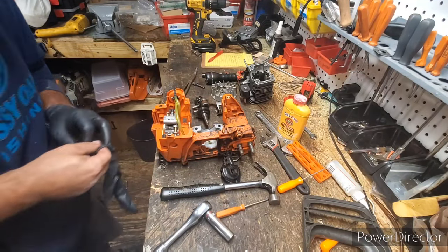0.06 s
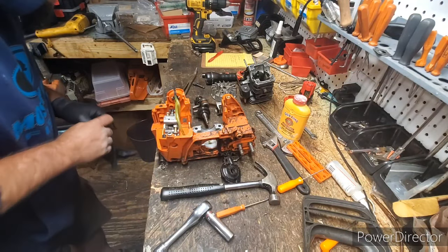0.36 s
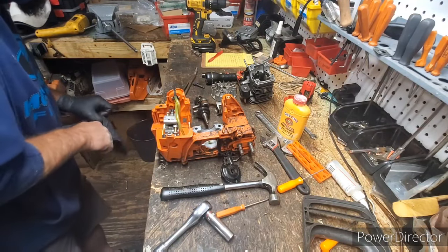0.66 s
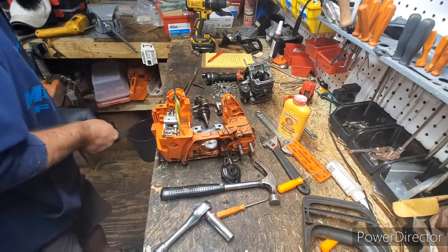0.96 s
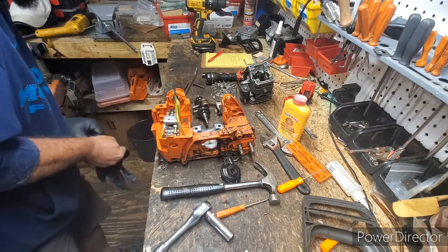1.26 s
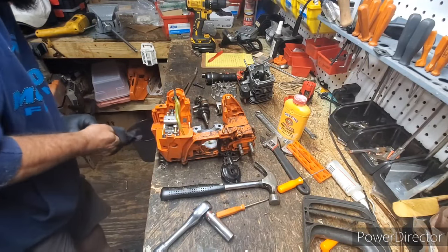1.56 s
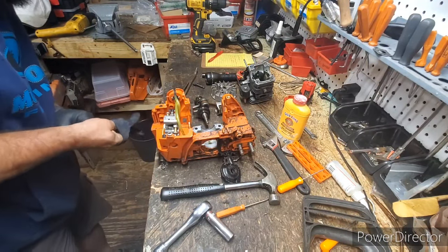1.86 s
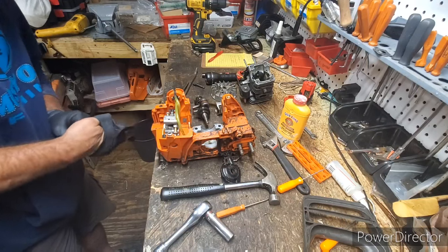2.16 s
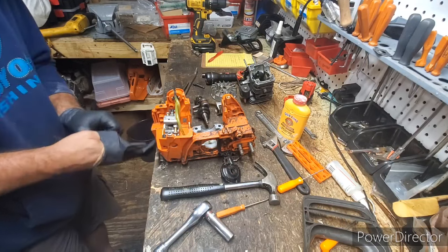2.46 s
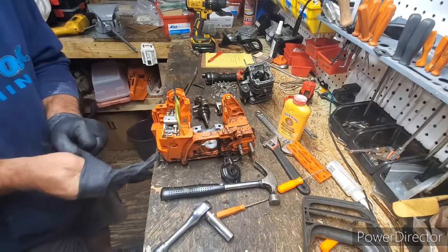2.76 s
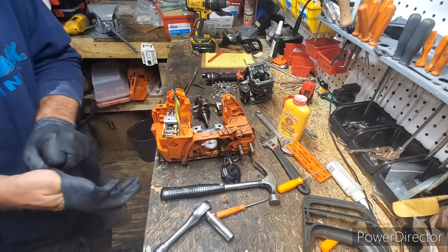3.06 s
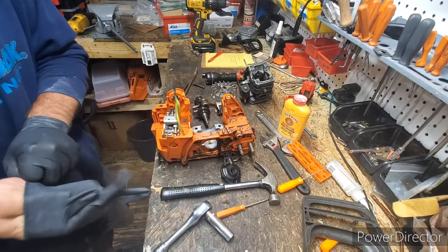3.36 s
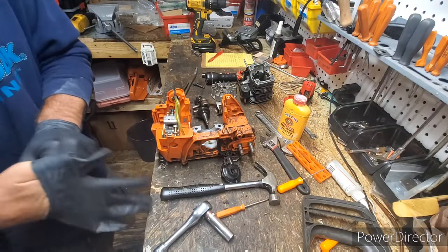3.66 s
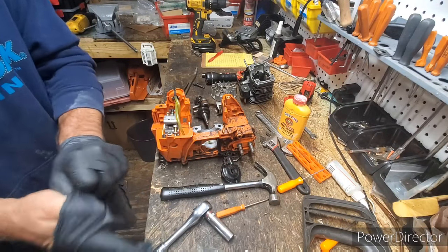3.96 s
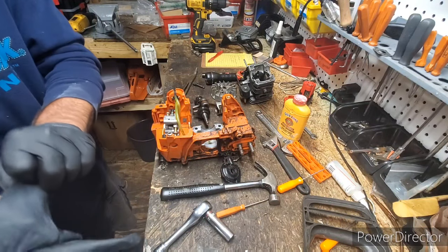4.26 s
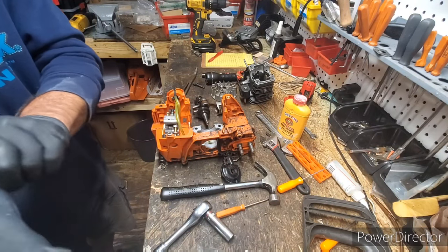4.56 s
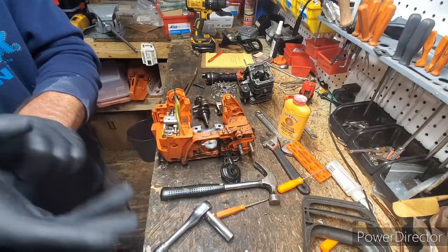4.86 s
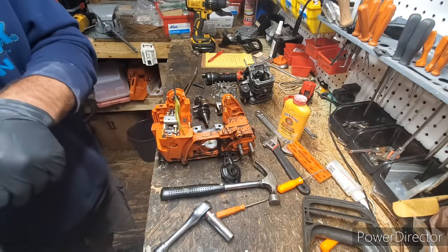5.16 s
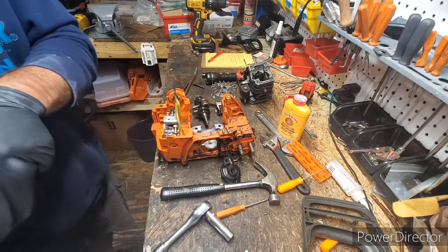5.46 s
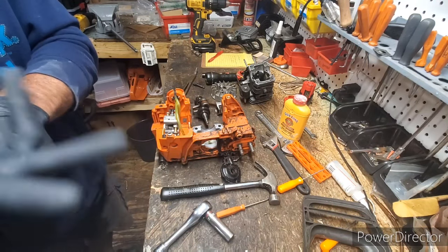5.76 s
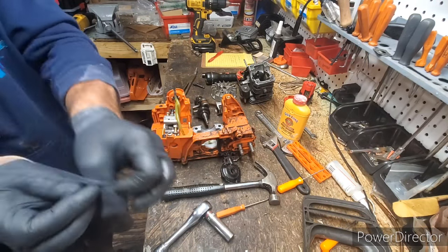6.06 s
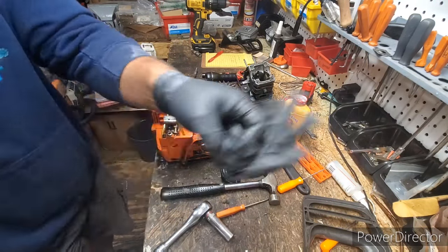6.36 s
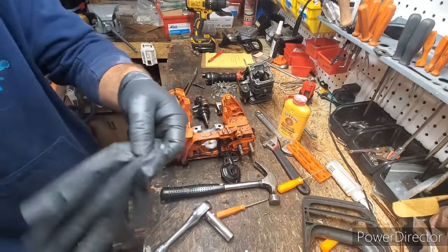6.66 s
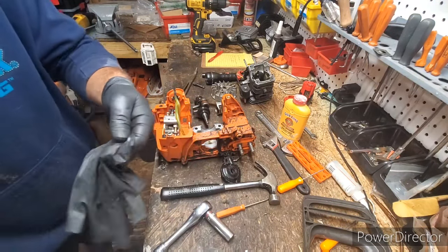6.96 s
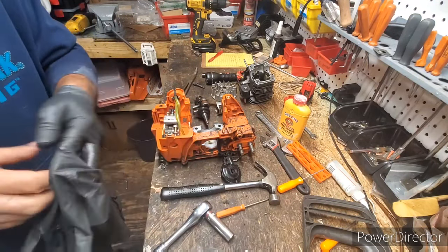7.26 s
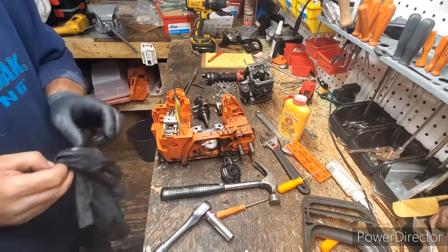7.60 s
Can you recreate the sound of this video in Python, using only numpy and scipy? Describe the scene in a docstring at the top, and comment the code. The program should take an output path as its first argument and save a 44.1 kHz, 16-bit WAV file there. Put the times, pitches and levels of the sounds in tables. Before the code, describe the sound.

A thin rubber glove is worked onto a hand and pulled off, with close rubbing, pops and sharp snaps in a quiet workshop.

```python
"""Rubber glove in a small workshop

Close to the microphone, on the left, a thin rubber glove is worked onto a hand and pulled off again.
The rubber rubs in tiny slips, peels off skin, snaps and flutters; trapped air pops; the loose glove flops.
The biggest flurry, near 6.3 s, is the stretched glove letting go of the fingers. The room hums faintly."""
import sys
import numpy as np
from scipy import signal
from scipy.fft import rfft, irfft
from scipy.io import wavfile

SR = 44100
rng = np.random.default_rng(int(sys.argv[2]) if len(sys.argv) > 2 else 0)


def transcribe(signal):
    """Save signal, clipped to [-1, 1], as a 16-bit WAV file at the path in sys.argv[1]."""
    frames = np.atleast_2d(signal).T
    limited = np.clip(frames, -1, 1)
    pcm = np.round(limited * 32767).astype(np.int16)
    wavfile.write(sys.argv[1], SR, pcm)


N = 345331
TIME = np.arange(N) / SR

# The shop's air, low hum and thin whine. Each row of the air: frequency in Hz, relative level in dB.
AIR_SPECTRUM = [(20, -20), (45, 6.5), (70, 4), (110, 0), (160, -6), (260, -14), (480, -18), (850, -29.5),
                (1400, -16.5), (2600, -27), (6500, -27.5), (7700, -30.5), (15500, -30)]
# Each row of the hum and the whine: time in seconds, level in dB.
HUM_LEVELS = [(0, -65), (1.0, -64), (1.25, -70), (1.85, -69.5), (2.15, -62.5), (3.3, -61.5), (3.8, -66.5),
              (5.6, -65.5), (6.8, -70.5), (7.83, -70.5)]
WHINE_LEVELS = [(1.5, -100), (2.0, -74.5), (2.75, -77), (3.25, -67.5), (4.0, -72.5), (5.9, -82.5),
                (6.8, -84.5), (7.25, -79), (7.8, -68)]
# The shop's decay. Each row: low and high edge in Hz, seconds to fall 60 dB, level in dB.
ROOM_BANDS = [(100, 1000, 0.21, -9.5), (1290, 4560, 0.12, -8.5), (7000, 22000, 0.12, -17.5)]
# Tone of the microphone's far, right-hand port. Each row: frequency in Hz, relative gain in dB.
FAR_PORT_SPECTRUM = [(300, 1), (1300, 0), (4000, -2.5), (6500, -1.5), (8500, 7), (14000, 1.5)]
# Where the hands are. Each row: time in seconds, leftward bias in dB.
HAND_POSITION = [(0.0, 9), (0.13, 7.5), (1.31, 9.5), (1.35, 6.5), (5.32, 8.5), (5.95, 11), (6.48, 5),
                 (6.85, 11), (7.11, 8), (7.83, 9.5)]

# Slack rubber, squeaky slips, tight slips and the fluttering sheet.
# Each row: frequency in Hz, relative level in dB.
BODY_SPECTRUM = [(25, -35), (70, -3), (180, -7), (350, -3), (550, 0.5), (800, -6), (1150, -4), (1600, -4),
                 (3000, -37.5)]
SQUEAK_SPECTRUM = [(1500, -31.5), (2800, -12), (3700, -1.5), (5200, -1.5), (6800, -0.5), (7600, -13),
                   (9000, -9), (12000, -33)]
HISS_SPECTRUM = [(4000, -35.5), (7500, -27), (9500, -6.5), (12000, 2), (15000, 6), (16000, -6.5)]
FLUTTER_SPECTRUM = [(25, -35.5), (100, -16), (250, -12), (450, 0.5), (900, -2), (1200, -3), (1800, 3.5),
                    (3200, -2), (5200, -3), (6800, 0.5), (7600, -14), (10000, -7.5), (15000, -4)]
# Resonances of the folds. Each row: centre in Hz, width in Hz, relative level in dB.
FOLD_MODES = [(1670, 650, -3), (2390, 490, -2), (2950, 720, 2), (3180, 1700, 0)]
# The slack glove shoves air; air pockets pop. Each row: start in seconds, level in dB, pitch in Hz.
GLOVE_FLOPS = [(.058, -36.5, 62), (.04, -48, 128), (.29, -43.5, 179), (.302, -38.5, 58), (.395, -50, 163),
               (1.0, -44.5, 60), (1.052, -49, 168), (5.255, -42, 90), (5.27, -41, 170), (6.07, -44.5, 120),
               (6.28, -34, 180), (6.32, -27.5, 173), (6.345, -38, 66), (6.935, -39.5, 179), (6.93, -43, 75),
               (7.145, -56.5, 197)]
AIR_POPS = [(1.058, -39.5, 650), (1.344, -42, 740), (1.385, -24.5, 600), (2.27, -42.5, 570),
            (3.664, -55, 785), (3.79, -38, 306), (4.231, -35, 630), (4.275, -33.5, 558), (4.314, -29, 597),
            (4.452, -29, 494), (4.661, -38.5, 493), (4.673, -35.5, 417), (4.709, -41, 476),
            (5.257, -28, 466), (5.271, -41.5, 280), (5.703, -37, 730), (6.07, -28.5, 524),
            (6.2838, -5.5, 484), (6.2845, -6, 905), (6.29, -16, 410), (6.309, -18.5, 412),
            (6.362, -14, 978), (6.379, -20.5, 482), (6.945, -43, 420)]
# First a faint, narrow, breath-like hiss near 1.8 kHz; the other rows are short rubbery resonances.
# Each row: middle in seconds, level in dB, half length in seconds, pitch in Hz, relative bandwidth.
NARROW_SWELLS = [(.33, -63, 0.12, 1790, .06), (1.715, -55.5, 0.018, 1600, .17),
                 (2.931, -51, 0.027, 1880, .12), (3.898, -48.5, .042, 2690, 0.27),
                 (4.477, -51, 0.028, 2040, 0.15), (5.047, -41.5, 0.039, 2630, .17)]
# Light contact between strokes. Each row: time in seconds, treble in dB, crinkle in dB above the treble.
LIGHT_CONTACT = [(0, -57.5, -19.5), (.25, -58.5, -4.5), (.45, -65, -3.5), (.53, -66.5, -4),
                 (1.29, -64.5, -13), (1.46, -55.5, -4), (1.85, -59, -8), (2.8, -65.5, -5.5),
                 (3.4, -63, 6.5), (3.95, -53.5, -5), (4.39, -68.5, 4.5), (4.52, -51.5, -1),
                 (4.95, -58, -5.5), (5.42, -51.5, -3.5), (5.9, -62, -15), (6.8, -68.5, -1),
                 (7.02, -65.5, -6.5), (7.83, -67, -4)]
# Strokes of rubber over skin or rubber. Each row: peak time in seconds, treble in dB,
# swell and fade in seconds, slack body and crinkle in dB above the treble.
RUB_STROKES = [(.035, -49, 0.012, 0.027, -35, -19), (.165, -50.5, 0.036, .015, -34, -14),
               (.39, -59, 0.029, 0.066, -16, -19), (0.562, -50.5, 0.0065, 0.036, -11, -12),
               (0.842, -62, 0.066, 0.05, -25, -12), (.956, -51, .007, 0.085, -20.5, -13.5),
               (1.055, -43, .008, 0.017, -2.5, -12.5), (1.33, -58, 0.032, .02, -8, -10),
               (1.71, -53.5, 0.033, 0.042, -1.5, -12), (1.955, -45, 0.039, 0.034, -10, -10),
               (2.15, -48.5, 0.061, 0.057, -7.5, -5.5), (2.212, -40, 0.032, 0.067, -11, -6.5),
               (2.392, -47.5, 0.017, 0.022, -5, -5.5), (2.46, -56.5, 0.052, 0.035, 0, -2),
               (2.59, -52.5, 0.093, 0.056, -9, -3.5), (2.70, -58, 0.022, 0.069, -12, -2.5),
               (2.928, -41, 0.03, 0.035, -14.5, -10), (3.04, -55.5, 0.034, 0.068, -10, -6.5),
               (3.21, -50, 0.057, 0.077, -4.5, -4), (3.32, -52.5, .015, .02, -5, -1),
               (3.49, -39, .06, 0.034, -10, -5), (3.59, -44, 0.034, 0.032, -18, -2.5),
               (3.808, -40, 0.079, 0.025, -10.5, -6), (3.89, -44, 0.069, 0.053, -8, -2.5),
               (4.08, -49.5, 0.11, 0.35, -20, -3), (4.275, -44.5, 0.023, 0.033, -16, -3.5),
               (4.446, -41, 0.018, 0.035, -29, -6), (4.674, -36, 0.046, 0.052, -17, -8),
               (4.81, -45.5, 0.06, 0.075, -11.5, -6), (4.878, -32.5, 0.034, 0.022, -14.5, -9.5),
               (5.065, -37, 0.062, 0.039, -17.5, -7), (5.19, -42, 0.023, 0.1, -2, -2.5),
               (5.288, -36, 0.12, .1, -11, -4.5), (5.57, -51, 0.027, 0.18, -14.5, -3.5),
               (5.66, -37, 0.0065, 0.053, -26, -16), (5.79, -54.5, .04, 0.026, -7, -6),
               (6.055, -40, 0.047, 0.18, -11.5, -7), (6.145, -39, 0.095, 0.21, -14.5, -7),
               (6.328, -35, 0.067, 0.1, 2, 1.5), (6.51, -50, 0.021, 0.075, -5.5, 0),
               (6.71, -62.5, 0.034, .07, -13, -10), (6.945, -61, 0.017, 0.034, 15.5, 5.5),
               (7.131, -59, 0.083, 0.057, 1, -2.5), (7.26, -58, .03, 0.025, -10, -9.5),
               (7.692, -48.5, 0.053, 0.033, -11, -9)]
# Clinging rubber peels away. Each row: release time in seconds, level in dB, rise in seconds.
SKIN_PEELS = [(5.223, -26.5, .008), (5.255, -21, .0054), (5.627, -35.5, 0.0037), (5.703, -20, 0.0042),
              (6.276, -19, .006), (6.315, -19, .002), (6.361, -27, .015)]
# The sheet snaps. Each row: start in seconds, crack level in dB, crack pitch in Hz,
# flutter level in dB, seconds for the flutter to fall 60 dB.
SHEET_SNAPS = [(1.336, -13.5, 5060, -32.5, 0.074), (1.342, -41, 1800, -30, .21),
               (1.384, -28, 2000, -24.5, 0.14), (3.141, -49, 7000, -54, .04),
               (3.664, -34.5, 2180, -51, 0.03), (4.1332, -7.5, 4020, -33.5, .06),
               (4.231, -23.5, 3950, -36, 0.059), (4.315, -19, 3670, -32.5, 0.036),
               (4.621, -26.5, 1950, -36, 0.038), (4.771, -20.5, 3000, -40.5, 0.069),
               (5.113, -17.5, 5260, -38, 0.036), (5.349, -14, 3760, -29.5, 0.054),
               (5.702, -6, 3060, -25.5, .035), (6.07, -21.5, 2500, -33, 0.036),
               (6.106, -22, 8000, -38, .03), (6.249, -4, 5500, -18, 0.049), (6.269, -19, 4106, -24, .16),
               (6.2833, -7, 2765, -14, 0.04), (6.3, -3, 6000, -19.5, 0.078), (6.313, -5, 3850, -17, 0.15),
               (6.3641, -7, 3000, -18.5, 0.062), (6.374, 0.5, 3650, -26, 0.085),
               (6.378, -1, 1800, -22, .17), (6.535, -33, 3470, -58, 0.072), (7.415, -37, 7010, -48, .08)]


def from_db(db):
    """Decibels to gain."""
    return 10 ** (np.asarray(db) / 20)


def unit_rms(x):
    """Scale to rms 1."""
    return x / np.sqrt(np.mean(x ** 2) + 1e-20)


def curves(rows):
    """Each column after the time, interpolated sample by sample."""
    times, *columns = np.transpose(rows)
    return [np.interp(TIME, times, column) for column in columns]


def drift(per_s):
    """Random wander of rms 1 that heads for a new value per_s times a second."""
    knots = rng.standard_normal(8192)
    return unit_rms(np.interp(TIME * per_s, np.arange(len(knots)), knots))


def bandpass(x, low_hz, high_hz):
    """Keep the band between two edges."""
    return signal.sosfilt(signal.butter(2, [low_hz, high_hz], "band", fs=SR, output="sos"), x)


def colour(x, spectrum):
    """Causal filter with the given spectral shape, keeping the power of white noise."""
    size = 4096
    hz, db = np.transpose(spectrum)
    bin_hz = np.arange(size // 2 + 1) * SR / size
    gain = from_db(np.interp(np.log(bin_hz + 1), np.log(hz), db))
    cepstrum = irfft(np.log(gain))
    cepstrum[1:size // 2] *= 2   # folded forward for minimum phase
    cepstrum[size // 2 + 1:] = 0
    response = irfft(np.exp(rfft(cepstrum)))
    return signal.oaconvolve(x, response / np.linalg.norm(response))[:N]


def add(track, start_s, sound):
    """Mix a sound into a track."""
    start = max(round(start_s * SR), 0)
    track[start:start + len(sound)] += sound[:N - start]


def ring(hz, t60, rise_s, glide):
    """A damped sine that starts sharp by the fraction glide and sinks towards hz."""
    t = TIME[:int(2 * t60 * SR)]
    pitch = hz * (1 + glide * np.exp(-2 * t / t60))
    return np.sin(2 * np.pi * np.cumsum(pitch) / SR) * from_db(-60 * t / t60) * (1 - np.exp(-t / rise_s))


def room_tone(air_db=-72, mains_hz=60.8, whine_hz=593):
    """Quiet air, partly shared by both ports, a wavering mains hum and a whine that comes and goes."""
    shared = rng.standard_normal(N)
    air = [colour(unit_rms(shared + 1.8 * rng.standard_normal(N)), AIR_SPECTRUM) for port in range(2)]
    hum_db = curves(HUM_LEVELS)[0] + 3 * drift(per_s=22)
    hum = from_db(hum_db) * np.sin(2 * np.pi * mains_hz * TIME + 1.3 * drift(per_s=20))
    whine_db = curves(WHINE_LEVELS)[0] + 1.8 * drift(per_s=11)
    whine = from_db(whine_db) * np.sin(2 * np.pi * whine_hz * TIME + 0.34 * drift(per_s=8.1))
    return from_db(air_db) * np.array(air) + np.sqrt(2) * (hum + whine)


def reflections(x, first_echo_s=0.0023):
    """Dense echoes from bench and walls, shorter in the treble and different at each port."""
    t, response = TIME[:SR // 2], 0
    for low_hz, high_hz, t60, db in ROOM_BANDS:
        tail = rng.standard_normal((2, len(t))) * from_db(-60 * t / t60) * (t > first_echo_s)
        tail /= np.linalg.norm(tail, axis=1, keepdims=True)
        response = response + from_db(db) * bandpass(tail, low_hz, high_hz)
    return signal.oaconvolve(x[None], response, axes=1)[:, :N]


def air_pockets(table, t60_cycles, rise_cycles, glide, puff_db):
    """Air held by the rubber rings, bending in pitch as its pocket changes size, and escapes in a puff."""
    out = np.zeros(N)
    for start_s, db, hz in table:
        t60, rise_s = t60_cycles / hz, rise_cycles / hz
        tone = ring(hz, t60, rise_s, glide)
        t = TIME[:len(tone)]
        noise = unit_rms(bandpass(rng.standard_normal(len(t)), hz / 1.5, hz * 1.43))
        puff = noise * from_db(puff_db - 60 * t / t60) * (1 - np.exp(-t / rise_s))
        add(out, start_s, from_db(db - 1.5) * (tone + puff))
    return out


def slips(per_s, spread_db, hiss):
    """Stick-slip: tiny random clicks over a smooth friction hiss; rms 1."""
    sizes = from_db(spread_db * np.minimum(rng.exponential(1, N), 4)) * rng.choice([-1, 1], N)
    clicks = sizes * (rng.random(N) < per_s / SR)
    return unit_rms(unit_rms(clicks) + hiss * rng.standard_normal(N))


def narrow_swells():
    """Narrow bands of noise swell and fade: one faint, breath-like hiss, then short rubbery resonances."""
    noise, out = slips(per_s=1500, spread_db=2, hiss=0.54), 0
    for middle_s, db, half_s, hz, width in NARROW_SWELLS:
        band = unit_rms(bandpass(noise, hz / (1 + width), hz * (1 + width)))
        swell = np.exp(-np.minimum(0.5 * ((TIME - middle_s) / half_s) ** 2, 20))
        out = out + from_db(db) * band * swell
    return out


def crinkling(waver_db=1.6):
    """Folds form and flatten, so each of their resonances swells and fades in its own time; rms 1."""
    friction, out = slips(per_s=1800, spread_db=1, hiss=1), 0
    for k, (hz, width_hz, db) in enumerate(FOLD_MODES):
        fold = unit_rms(signal.lfilter(*signal.iirpeak(hz, hz / width_hz, fs=SR), friction))
        out = out + (-1) ** k * fold * from_db(db + waver_db * drift(per_s=34))
    return unit_rms(bandpass(out, 1200, 4500))


def hand_strokes(drop_db=8.5, roundness=1.72):
    """Strokes swell and fade over light contact; gives treble, and body and crinkle above it, in dB."""
    contact_db, fold_db = curves(LIGHT_CONTACT)
    contact_crinkle_db = contact_db + fold_db
    power = from_db([contact_db, contact_crinkle_db - 1.5, contact_crinkle_db]) ** 2
    t = np.arange(-SR // 3, SR // 3) / SR
    for peak_s, db, swell_s, fade_s, body_db, crinkle_db in RUB_STROKES:
        from_peak = np.abs(t) / np.where(t < 0, swell_s, fade_s)
        stroke = from_db(db - drop_db * from_peak ** roundness)[peak_s + t >= 0]
        for layer, share_db in zip(power, (0, body_db, crinkle_db)):
            add(layer, peak_s + t[0], (from_db(share_db) * stroke) ** 2)
    treble, body, crinkle = 10 * np.log10(power)
    return treble, body - treble, crinkle - treble


def rubbing(treble_db, body_db, crinkle_db):
    """Slips sound low in slack rubber and hiss in tight rubber; the sheet catches unevenly."""
    hiss_db = -7.5 - 0.38 * crinkle_db   # a tightening sheet crinkles less and hisses more
    squeak_db = 10 * np.log10(np.clip(1 - from_db(hiss_db) ** 2, 0.15, 1))   # the rest of the treble
    friction = slips(per_s=2200, spread_db=0, hiss=0.85)
    body_gain = from_db(body_db - 4.5 + 3.4 * drift(per_s=20))
    body = body_gain * colour(slips(per_s=900, spread_db=5, hiss=1), BODY_SPECTRUM)
    crinkle = from_db(crinkle_db - 2.3) * crinkling()
    squeak = from_db(squeak_db - 3) * colour(friction, SQUEAK_SPECTRUM)
    hiss = from_db(hiss_db + 1) * colour(friction, HISS_SPECTRUM)
    return from_db(treble_db + 1 + 0.83 * drift(per_s=130)) * (body + crinkle + squeak + hiss)


def peeling(fall_s=0.0039):
    """A bright rush of slips builds up and stops as the rubber comes free of the skin."""
    pull, t = np.zeros(N), np.arange(-SR // 10, SR // 10) / SR
    for release_s, db, rise_s in SKIN_PEELS:
        add(pull, release_s + t[0], from_db(db) * np.exp(np.minimum(t / rise_s, -t / fall_s)))
    rush = pull * slips(per_s=8100, spread_db=2, hiss=0.23)
    hiss = from_db(-1) * colour(rush, HISS_SPECTRUM)
    squeak = from_db(-6) * colour(rush, SQUEAK_SPECTRUM)
    flutter = from_db(-7) * colour(rush, FLUTTER_SPECTRUM)
    return hiss + squeak + flutter


def snapping(crack_t60_cycles=6.8):
    """Each snap is a short crack, then the sheet flutters against itself and dies away."""
    cracks, shaking = np.zeros(N), np.zeros(N)
    for start_s, crack_db, hz, flutter_db, t60 in SHEET_SNAPS:
        crack = ring(hz, crack_t60_cycles / hz, rise_s=0.00003, glide=0.13)
        add(cracks, start_s, from_db(crack_db + 2) * crack)
        t = TIME[:int(2 * t60 * SR)]
        add(shaking, start_s, from_db(flutter_db - 60 * t / t60))
    flutter = slips(per_s=3700, spread_db=3.5, hiss=1) * from_db(1.2 * drift(per_s=200))
    return cracks + colour(shaking * flutter, FLUTTER_SPECTRUM)


def scene(port_lag_s=0.00026):
    """The near, left port faces the glove; the far one hears it later, its front dulled, plus its back."""
    stroke_levels = hand_strokes()
    left_db, = curves(HAND_POSITION)
    front, back = [rubbing(*stroke_levels) + snapping() + peeling() for side in range(2)]
    front = front + narrow_swells()
    pops = air_pockets(AIR_POPS, t60_cycles=17, rise_cycles=0.25, glide=0.06, puff_db=-12)
    flops = air_pockets(GLOVE_FLOPS, t60_cycles=23.8, rise_cycles=0.55, glide=0.032, puff_db=-5)
    near = front + pops + flops
    dulled = signal.sosfilt(signal.butter(1, 4500, fs=SR, output="sos"), front)
    far_rubber = from_db(-left_db) * (from_db(-5) * dulled + from_db(0.84) * back)
    far = far_rubber + from_db(-7.5) * pops + from_db(0.5) * flops
    far = np.interp(TIME - port_lag_s, TIME, far)
    room_left, room_right = reflections(near)
    return np.array([near + room_left, colour(far + room_right, FAR_PORT_SPECTRUM)]) + room_tone()


def record(dry):
    """The recorder rounds off the highest peaks and cuts the top of the treble."""
    ceiling, cutoff_hz = 1.3, 15800
    rounded = ceiling * np.tanh(dry / ceiling)
    return signal.sosfilt(signal.ellip(10, 0.2, 70, cutoff_hz, fs=SR, output="sos"), rounded)


dry = scene()
out = record(dry)
transcribe(out)
```